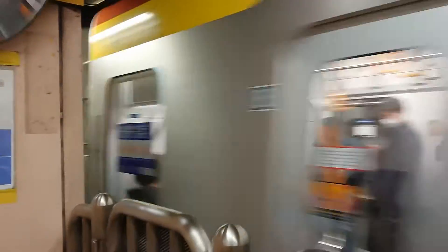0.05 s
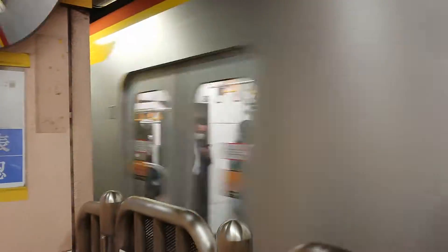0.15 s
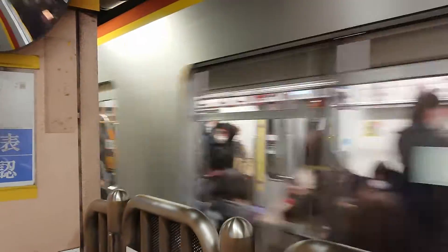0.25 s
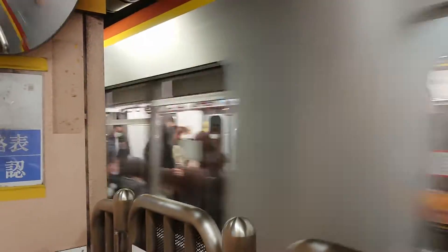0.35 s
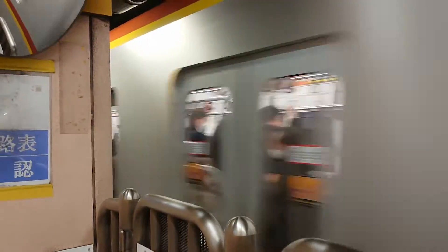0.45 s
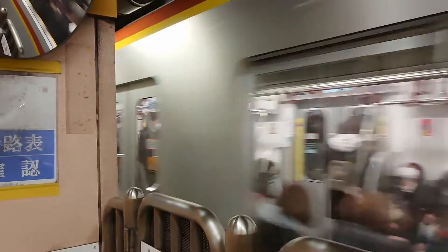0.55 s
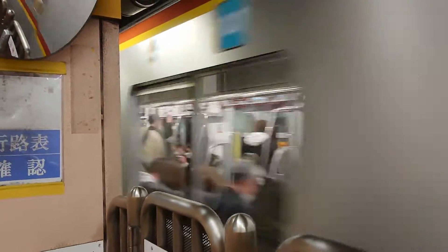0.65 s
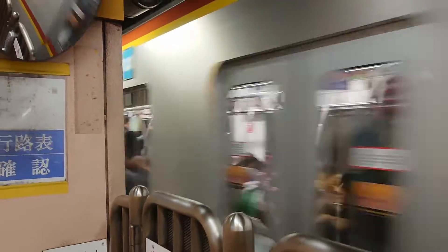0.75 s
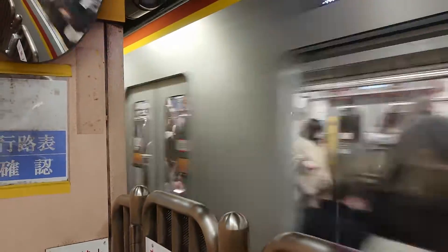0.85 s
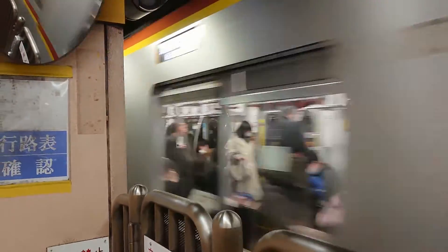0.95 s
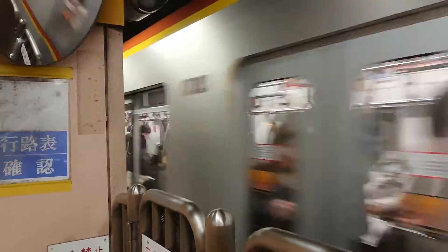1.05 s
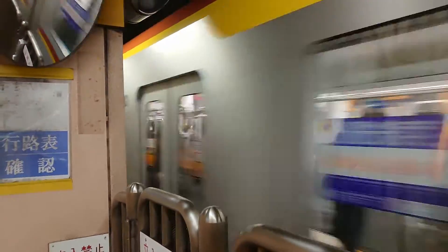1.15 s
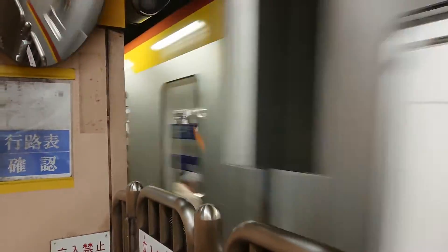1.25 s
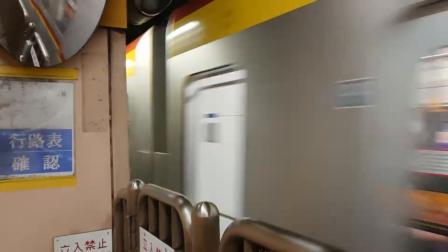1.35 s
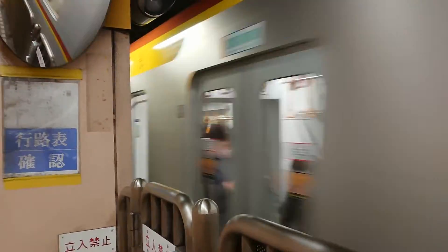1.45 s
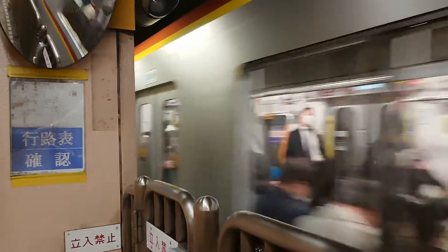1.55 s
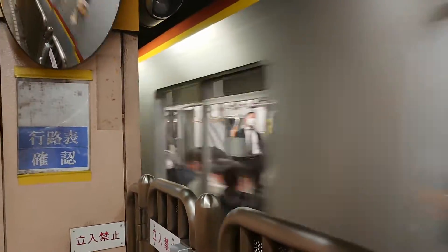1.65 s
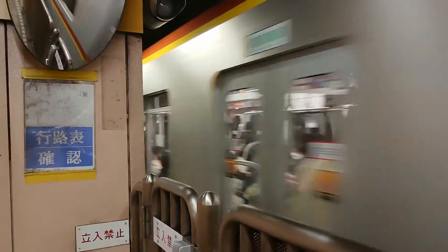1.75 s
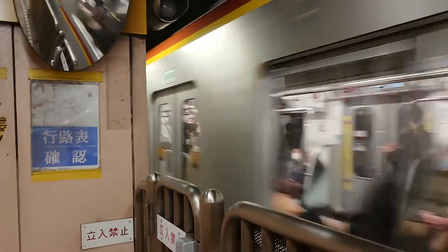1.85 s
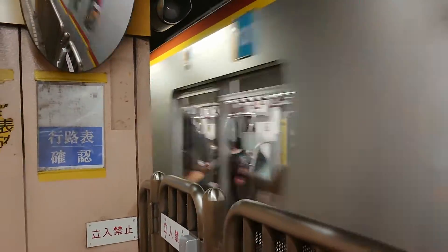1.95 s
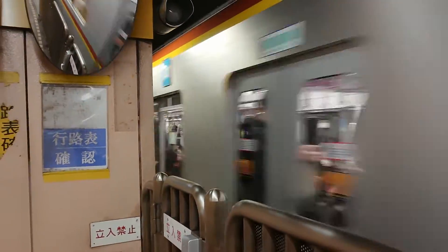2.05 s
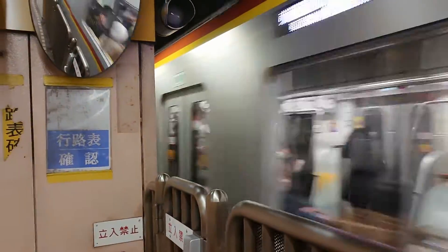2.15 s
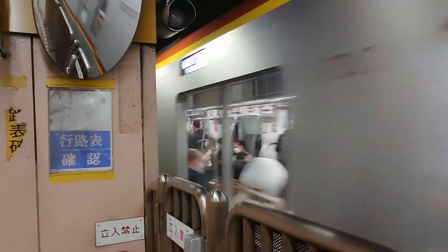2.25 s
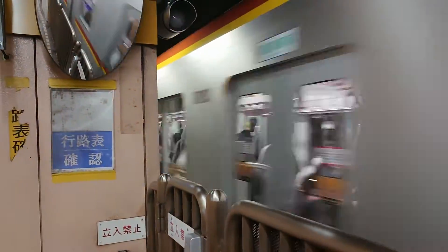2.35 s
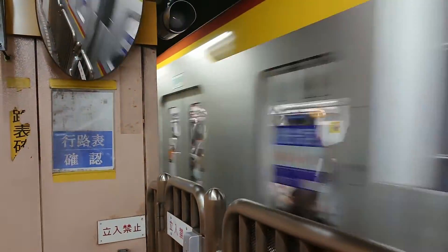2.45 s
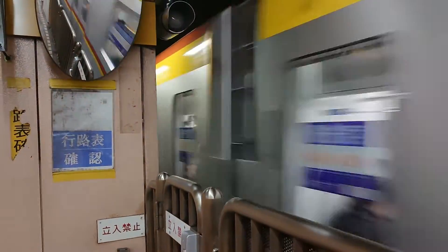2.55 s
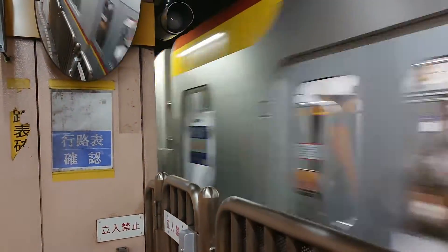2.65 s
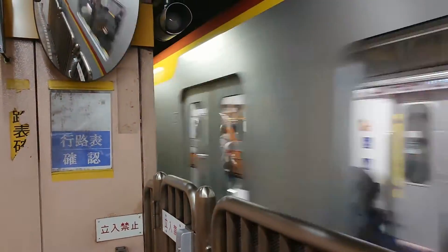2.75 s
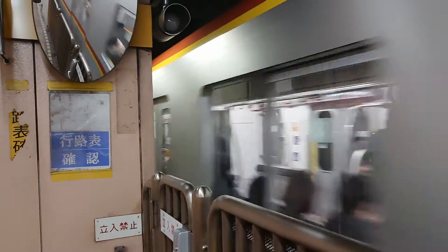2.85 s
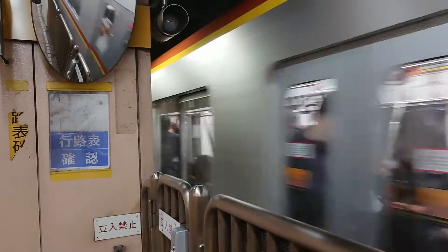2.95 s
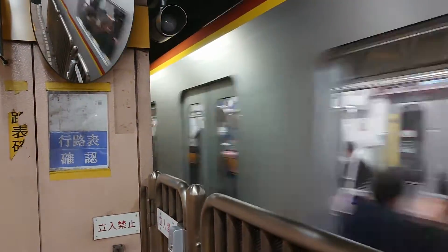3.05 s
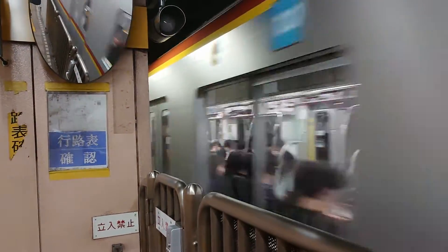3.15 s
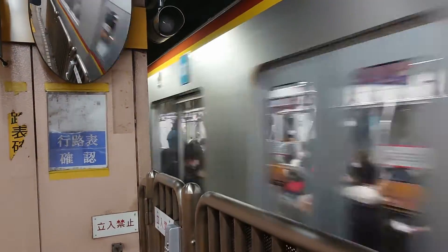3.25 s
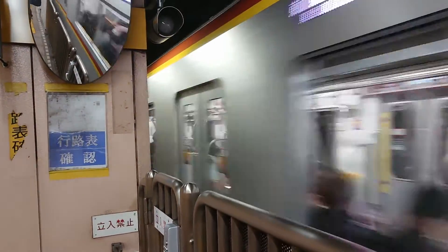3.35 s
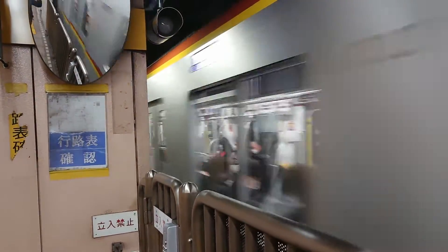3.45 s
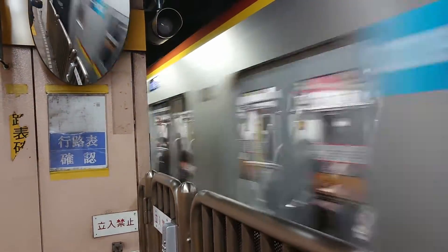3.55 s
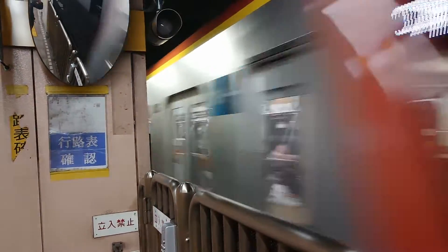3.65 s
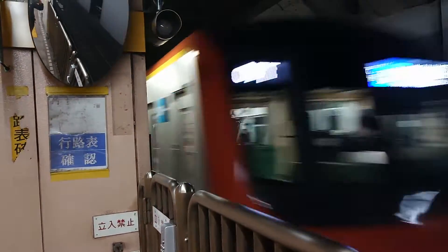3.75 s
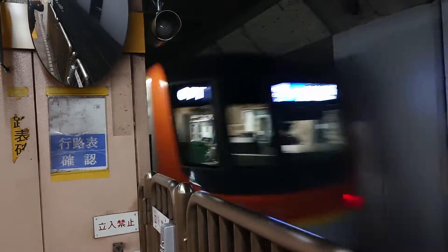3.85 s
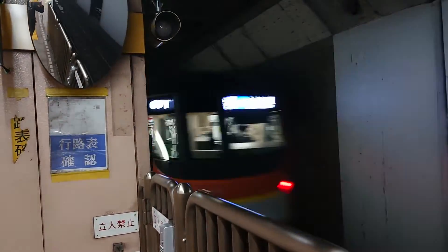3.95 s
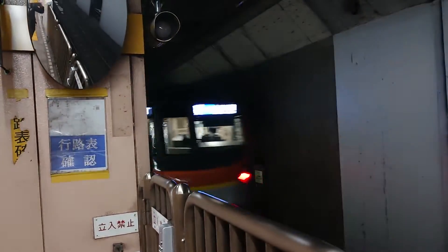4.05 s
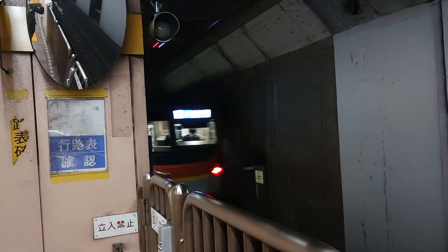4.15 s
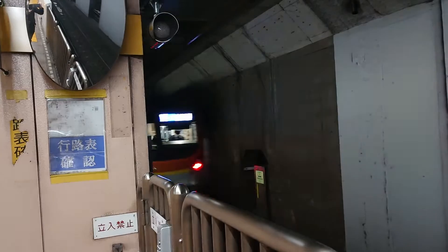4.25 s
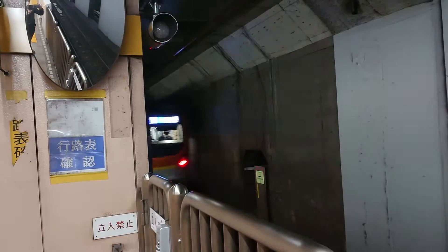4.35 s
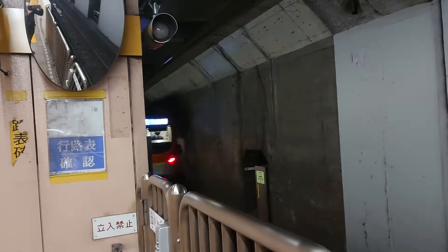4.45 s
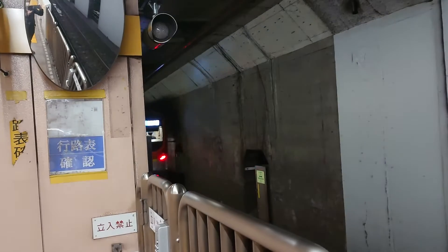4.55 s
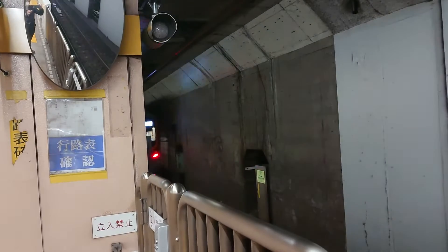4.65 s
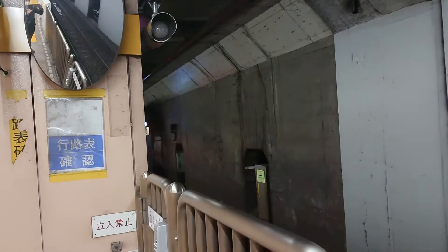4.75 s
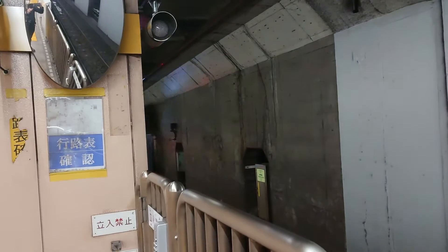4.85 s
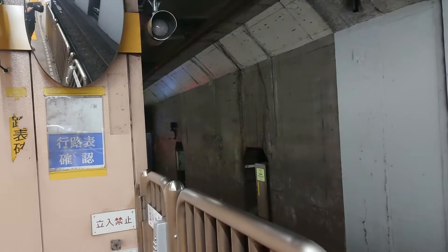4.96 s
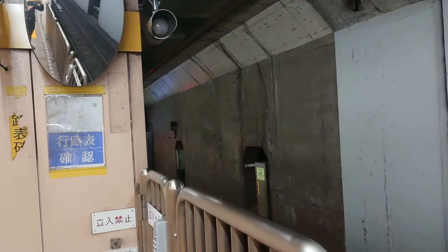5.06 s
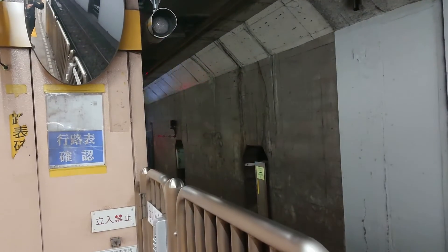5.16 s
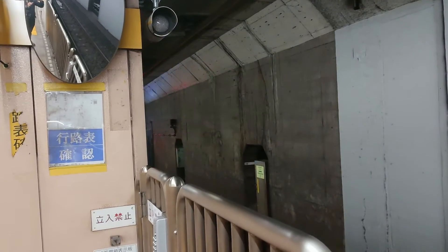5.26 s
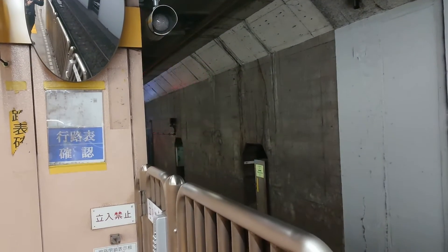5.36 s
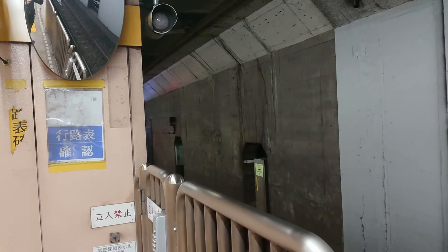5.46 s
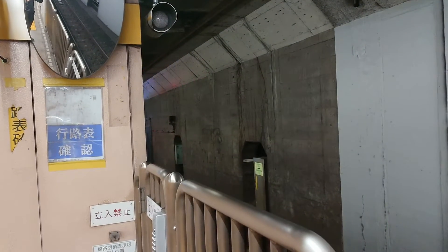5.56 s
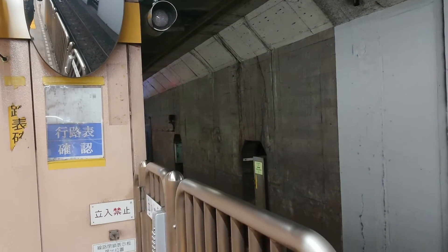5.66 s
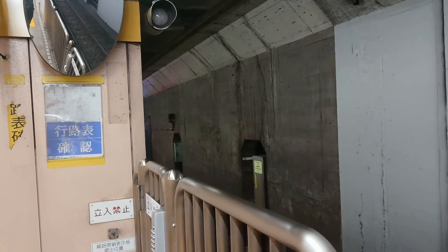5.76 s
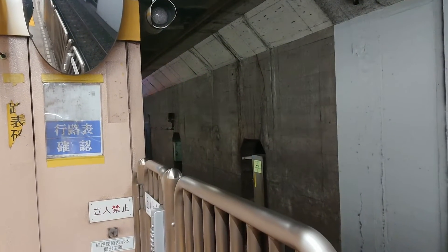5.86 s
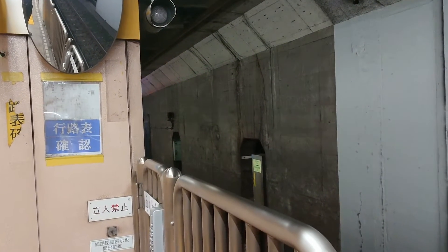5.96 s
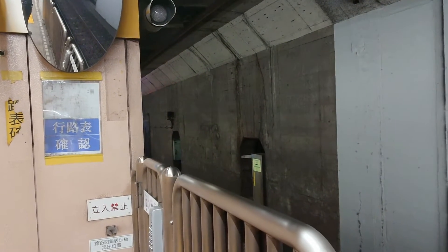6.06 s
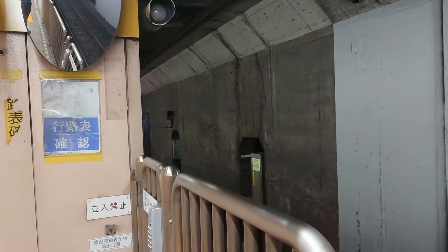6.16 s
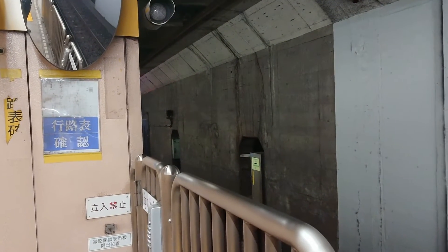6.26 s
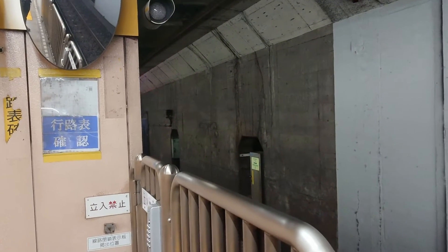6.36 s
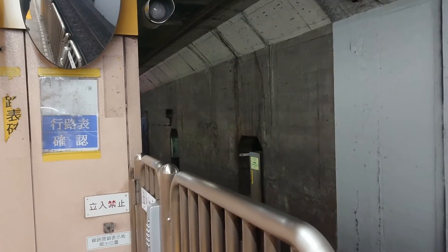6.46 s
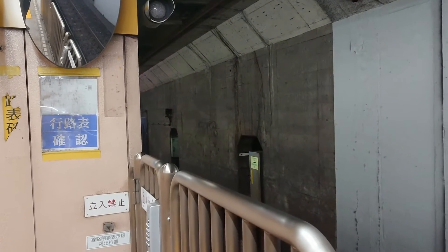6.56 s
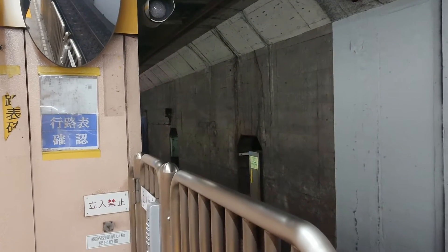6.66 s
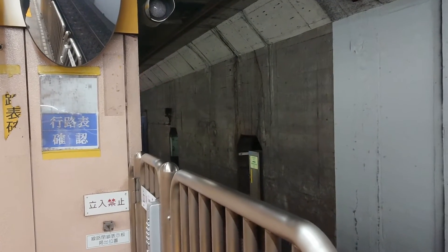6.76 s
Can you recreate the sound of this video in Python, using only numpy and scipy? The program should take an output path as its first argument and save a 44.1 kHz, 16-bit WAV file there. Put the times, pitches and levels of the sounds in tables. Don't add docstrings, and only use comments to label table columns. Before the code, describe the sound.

Close beside an underground platform, train cars roar past with a booming low rumble, metallic wheel ring, dull knocks and short air hisses. Around four seconds the last car passes and the sound sinks into the tunnel, losing brightness, while the trailing draught flutters and thumps against a hand-held phone microphone, hardest just after six seconds.

```python
import sys
import numpy as np
from scipy import signal
from scipy.fft import rfft, irfft
from scipy.io import wavfile
from scipy.ndimage import uniform_filter1d

SR = 44100
rng = np.random.default_rng(int(sys.argv[2]) if len(sys.argv) > 2 else 0)


def wav_record(signal):
    frames = np.transpose(np.atleast_2d(signal))
    bounded = np.clip(frames, -1, 1)
    quanta = np.round(bounded * 32767).astype(np.int16)
    wavfile.write(sys.argv[1], SR, quanta)


def boost_factor(decibels):
    exponent = np.asarray(decibels, float) / 20
    return 10 ** exponent


N = 300762
T = np.arange(N) / SR
HZ = np.maximum(np.arange(N // 2 + 1) * SR / N, 1)
LAST_CAR_S = 3.96


def on_hz(table, hz):
    f, v = np.transpose(table)
    return np.interp(np.log(hz), np.log(f), v)


def curves(table):
    s, *columns = np.transpose(table)
    return np.array([np.interp(T, s, c) for c in columns])


def unit(x):
    return x / np.sqrt(np.mean(x ** 2))


def coloured_noise(colour):
    return unit(irfft(rfft(rng.standard_normal(N)) * boost_factor(on_hz(colour, HZ)), N))


def walk(rate_hz):
    hold = int(SR / rate_hz)
    steps = np.repeat(rng.standard_normal(N // hold + 1), hold)
    return 1.84 * uniform_filter1d(uniform_filter1d(steps, hold), hold)[:N]


def swell(rows):
    return sum(db * np.exp(-((T - s) / width_s) ** 2) for s, db, width_s in rows)


def pair():
    # frequency in Hz, left-right likeness as a share.
    likeness = [(60, 1), (150, 0.97), (300, 0.92), (440, 0.73), (860, 0.49), (1700, 0.016), (14000, 0.16)]
    mid, side = rfft(rng.standard_normal((2, N)))
    like = np.clip(on_hz(likeness, HZ), 0, 1)
    return np.sqrt((1 + like) / 2) * mid + np.sqrt((1 - like) / 2) * side * np.array([[1], [-1]])


def resonance(source, hz, width_hz, core=(1, 1, -99)):
    def mode(hz, width_hz):
        return 1 / (1 + 1j * (HZ / hz - hz / HZ) * hz / width_hz) ** 2

    core_hz, core_width_hz, core_db = core
    response = mode(hz, width_hz) + boost_factor(core_db) * mode(core_hz, core_width_hz)
    return unit(irfft(source * response, N))


def grains(table, glide, front, scatter):
    # frequency in Hz, level in dB per Hz.
    tear_colour = [(120, -21.5), (220, 6.5), (350, -3), (600, -13.5), (900, -25), (1500, -26.5),
                   (3000, -59.5)]
    tear = coloured_noise(tear_colour)
    out = np.zeros(N)
    front = np.clip(front, .3, 1)
    top = .5 ** (1 / front)
    for (s, db, hz, ms, tear_db), turn in zip(table, rng.random((len(table), 1))):
        u = np.linspace(0, 1, int(2 * ms * SR / 1000))
        turns = np.cumsum(hz * (1 + glide * (top - u))) / SR
        phase = 2 * np.pi * (turns - turns[int(len(u) * top)] + scatter * (turn - .5))
        at = np.clip(int(s * SR - len(u) * top) + np.arange(len(u)), 0, N - 1)
        envelope = np.sin(np.pi * u ** front) ** 2
        out[at] += boost_factor(db) * envelope * (np.cos(phase) + boost_factor(tear_db + 9) * tear[at])
    return out


def layers():
    # time in s, level in dB.
    nearness = [(0, -1.5), (.45, -1), (1, -0.5), (1.5, -0.5), (2, 0.5), (2.5, 0.5), (2.9, -0.5), (3.3, -.5),
                (3.6, -2.5), (3.9, -3), (4.22, -3.5), (4.4, -5), (4.8, -7), (5.3, -8.5), (5.8, -11),
                (6.2, -12.5), (6.5, -11), (6.82, -10.5)]
    # level in dB, share of the nearness, swell in dB as a coupling passes, time of one swell in s.
    parts = [
        (-18.5, 1.21, 0, 2),
        (-20, 1.205, 1, 1.44),
        (-25.5, 1.016, 0.3, 1.7),
        (-35, 0.71, 0.8, 1.4),
    ]
    car_s = 1.15
    near_db = curves(nearness)[0]
    passing = np.clip((LAST_CAR_S - T) / 0.25, 0, 1)
    return np.array([db + share * near_db + swell_db * passing * np.cos(2 * np.pi * (T - s) / car_s)
                     for db, share, swell_db, s in parts])


def in_tunnel():
    # level at the platform in dB, change in the tunnel in dB.
    ring_balance = [
        (-7, 11.5),
        (-1.5, 5),
        (-0.16, -2.5),
    ]
    into_tunnel_s = 2.04
    share = np.clip((T - LAST_CAR_S) / into_tunnel_s + 1, 0, 1)
    return [db + change_db * share for db, change_db in ring_balance]


def rolling(steer_db):
    # frequency in Hz, level in dB per Hz.
    roughness = [(40, -26.5), (70, -11), (105, -5.5), (160, -2), (230, -5), (310, -10.5), (520, -9.5),
                 (900, -19.5), (1500, -27), (2300, -27.5), (3200, -35), (5000, -39), (9000, -43.5),
                 (14000, -54.5)]
    steer_hz = [190, 550, 1800, 4500]
    level_db = -14.5
    source = pair() * boost_factor(on_hz(roughness, HZ))
    scale = np.sqrt(np.mean(irfft(source, N) ** 2))
    swell_db = .4 * walk(2.5)
    octave = np.log2(HZ)
    out = 0
    for step in range(18):
        centre_hz = 40 * 2 ** (step / 2)
        mask = np.cos(np.pi / 2 * np.clip(2 * (octave - np.log2(centre_hz)), -1, 1)) ** 2
        share = [np.interp(np.log(centre_hz), np.log(steer_hz), row) for row in np.eye(4)]
        flicker_db = 1.2 * min(300 / centre_hz, 1) + .4
        band_db = share @ steer_db + swell_db + flicker_db * walk(9)
        out = out + boost_factor(band_db) * irfft(source * mask, N)
    return boost_factor(level_db) * out / scale


def booms(roar_db):
    # frequency in Hz, width in Hz, level in dB.
    cavities = [(61.6, 24, -11.5), (142.9, 20.7, -7), (168, 26.7, -6), (217.9, 37.5, -8.5),
                (337.3, 36, -15), (459.6, 56, -17)]
    # time in
    # s, level in dB, width in s.
    boom_swells = [
        [(.5, -7.5, .08), (2.07, 3.5, .08), (2.42, -5.5, .15)],
        [(0, 8, 0.61), (1.25, -0.5, 0.19), (1.85, 4, .12), (2.3, 2, .15), (2.8, 3, .15), (3, 2, 0.47),
         (3.8, -4, .15)],
        [(.2, -11.5, 0.44), (.8, -3, .12), (1.65, -4, .1), (4.7, -4, .15), (2.7, 3.5, 0.62), (3.7, -6, 0.36)],
        [(.3, -4, 0.15), (1.3, 6, 0.24), (1.85, 2.5, .1), (2.3, 4.5, 0.13), (3.6, -4.5, 0.19)],
        [(.08, 8, 0.092), (1, -3, 0.22), (1.63, 10, 0.14), (2, -9.5, 0.1), (2.5, 8, 0.13), (6, -8, .06)],
        [(.33, 8, .1), (.6, -2, .1), (1.35, 12.5, .12), (2.05, -4.5, 0.11), (2.55, -1, .1), (6, -8, .06)],
    ]
    source = pair()
    return sum(boost_factor(roar_db + db + swell(rows) + walk(3.99)) * resonance(source, hz, width_hz)
               for (hz, width_hz, db), rows in zip(cavities, boom_swells))


def wheels(roll_db):
    # frequency in Hz, width in Hz, level in dB.
    modes = [(1287, 440, -5), (1892, 324, -6.5), (2667, 325, -10), (3650, 400, -12.5), (4420, 370, -16.5)]
    # frequency in Hz, width in Hz, dB over the broad ring.
    cores = [(1313, 83, -5.5), (1952, 110, -14), (2705, 100, -7.5), (3726, 100, -11.5), (4340, 70, -8)]
    # time in s,
    # level in dB, width in s.
    mode_swells = [
        [(3, 2, 0.35), (3.95, 0.5, 0.22), (5.3, -1.5, 0.32), (6, -1.5, .2)],
        [(1.2, -1.5, .9), (2.75, 1, .15), (4.15, 1, .2), (5.3, 0.5, 0.34), (6.6, -1, .3)],
        [(1.5, -2, .9), (3, 2, 0.41), (3.9, 0, 0.43), (5.2, 2, 0.37), (6.6, -1.5, .3)],
        [(1, -1.5, .8), (6.6, -1, .3)],
        [(3.5, -1.5, .6), (6.6, -2, .3)],
    ]
    # time in s, pitch drop as a share.
    recede = [(0, 0), (3.7, 0), (4.5, .025), (6.82, .035)]
    air_loss_db_per_s = 2.5
    waver_share = .004

    source = pair()
    lowest_db, upper_db, _ = in_tunnel()
    loss_db = air_loss_db_per_s * np.maximum(T - recede[1][0], 0)
    ring = []
    for (hz, width_hz, db), core, rows in zip(modes, cores, mode_swells):
        mode_db = db - loss_db * (hz / 3000) ** 2 + swell(rows) + walk(6)
        ring.append(boost_factor(mode_db) * resonance(source, hz, width_hz, core))

    place = np.cumsum(1 - curves(recede)[0] + waver_share * walk(8))

    def bend(part):
        return np.array([np.interp(place, np.arange(N), port) for port in part])

    return boost_factor(roll_db + lowest_db) * bend(ring[0]) + boost_factor(roll_db + upper_db) * bend(sum(ring[1:]))


def air():
    # time in s, peak in dB above 8 kHz, attack in s, release in s.
    jets = [(.08, -56, 0.12, 0.074), (.33, -54.5, 0.089, 0.023), (.7, -70.5, .2, 0.18),
            (1.62, -65.5, 0.16, 0.14), (2.13, -53.5, 0.066, 0.072), (2.4, -51.5, 0.085, 0.089),
            (2.55, -49.5, 0.07, 0.066), (2.66, -52, .05, 0.11), (2.85, -56, 0.094, 0.13),
            (3.55, -71, 0.048, 0.08), (4.05, -63.5, 0.16, .05), (4.22, -67, 0.099, 0.33)]
    # frequency in Hz, level in dB.
    jet_colour = [(800, -7), (2000, 6), (3500, 3.5), (7000, -0.5), (10000, 0), (13000, 2.5), (15500, 7.5)]
    leak_db, leak_fade_db_per_s, level_db = -70, 4.5, 28.5
    flow = boost_factor(leak_db - leak_fade_db_per_s * np.maximum(T - LAST_CAR_S, 0))
    for s, db, attack_s, release_s in jets:
        rise = (np.minimum(T - s, 0) / attack_s) ** 2
        fall = (np.maximum(T - s, 0) / release_s) ** 2
        flow = flow + boost_factor(db) * np.exp(-rise - fall)
    hiss = unit(irfft(pair() * boost_factor(on_hz(jet_colour, HZ)), N))
    return flow * boost_factor(level_db + 1.2 * walk(35)) * hiss


def draught():
    # time in s, left level in dB, right level in dB.
    gust_levels = [(0, -37.5, -35.5), (.9, -33, -29.5), (1.05, -29.5, -19.5), (1.35, -28, -24),
                   (1.5, -31, -30), (2.5, -26.5, -21.5), (3.5, -28, -29.5), (4, -22, -18.5),
                   (4.3, -17, -21.5), (4.75, -27.5, -32.5), (5.1, -18, -26.5), (5.5, -26, -29),
                   (5.75, -22.5, -25.5), (6.03, -26.5, -25.5), (6.3, -14, -24), (6.5, -22.5, -27),
                   (6.7, -15, -23.5), (6.82, -15, -26)]
    # frequency in Hz, level in dB.
    wind_colour = [(25, -25.5), (45, -3), (62, 9), (90, -1.5), (150, -6.5), (300, -12), (600, -52)]
    # time in s, peak in dB, frequency in Hz, length in ms.
    left_eddies = [(3.294, -11, 78, 38), (4.086, -14, 170, 14), (4.113, -9, 101.4, 19),
                   (4.245, -4.5, 70.6, 38), (4.481, -9.5, 93, 18), (4.503, -11, 103.4, 14),
                   (5.04, -6, 121.5, 15), (5.062, -11.5, 78, 22), (5.124, -8, 141.6, 7.3),
                   (5.307, -5, 145.6, 8), (5.584, -6.5, 110, 10), (5.608, -9.5, 70.2, 16),
                   (5.626, -11.5, 70.5, 14), (5.655, -8.5, 100, 10), (5.671, -5.5, 75, 14),
                   (5.688, -10, 90.4, 9), (5.707, -11, 79, 15), (5.88, -8.5, 74.3, 17),
                   (5.904, -3.5, 101.8, 13), (5.928, -6.5, 138, 11), (6.119, -12.5, 113, 19),
                   (6.203, -13.5, 79.7, 10), (6.2135, -8.5, 168, 5.5), (6.194, -9, 90, 12),
                   (6.235, 7.5, 149.6, 6.5), (6.246, 4, 74.5, 11), (6.262, -11.5, 70, 14),
                   (6.297, -7, 120, 8), (6.32, -11.5, 75, 20), (6.357, -5, 120, 8.2),
                   (6.378, -3.5, 84.7, 36), (6.591, -9, 119.7, 12), (6.602, -10, 130, 8),
                   (6.615, -7.5, 131.4, 8), (6.6295, -0.5, 112, 11), (6.697, 1, 110.5, 7.6),
                   (6.705, -5.5, 69, 8), (6.722, -3.5, 152.5, 14), (6.732, -5, 139, 6),
                   (6.746, -5.5, 139, 9), (6.751, -7.5, 110, 8), (6.78, -3.5, 150, 6.8),
                   (6.788, -3, 69.2, 14), (6.805, -8, 64.8, 12)]
    right_eddies = [(1.047, -17.5, 105.7, 26), (1.083, -9.5, 71, 25), (1.192, -12.5, 69, 13),
                    (1.244, -9, 72.3, 20), (1.3, -12.5, 65.6, 31), (2.6, -9.5, 80.6, 33),
                    (2.648, -8, 76, 21), (2.679, -13.5, 87.3, 12), (4.057, -4, 89.6, 18),
                    (4.086, -7, 142, 18), (4.119, -6.5, 124.3, 12), (4.14, -8.5, 85.4, 19),
                    (4.212, -12, 124, 8.7), (5.117, -13, 100, 8), (6.242, -16.5, 102.3, 22),
                    (6.285, -11, 124, 9.8)]
    slaps = [(5.039, -8.5, 416, 3.3), (5.894, -12.5, 470, 2.7), (5.95, -14, 280, 5), (6.235, 0, 330, 4),
             (6.2345, -3, 650, 3.2), (6.238, -8, 590, 1.8), (6.235, -3, 1100, 1.4), (6.237, -10, 1100, 2),
             (7.1, -17, 2400, 1), (6.2345, -22, 4800, .6), (7.4, -10.5, 500, 3), (6.724, -10, 400, 4),
             (5.586, -15, 340, 3), (5.666, -15, 450, 2.6), (5.698, -13, 360, 3), (6.78, -13, 330, 4),
             (6.604, -11, 460, 2.8), (6, -9, 390, 5), (6.6345, -4, 430, 3), (6.59, -14, 450, 4),
             (6.626, -12, 550, 4), (7.6, -13.5, 400, 3.3), (6.697, -9, 330, 3), (6.736, -5, 480, 3),
             (6.712, -12, 300, 6), (6.743, -11, 350, 5)]
    tear_db, tear_db_per_octave = -25, 8.5

    def torn(rows):
        return [(*row, tear_db + tear_db_per_octave * np.log2(row[2] / 100)) for row in rows]

    gusts_db = curves(gust_levels)
    flutter = np.array([coloured_noise(wind_colour) * boost_factor(db - 3 + 1.5 * walk(14)) for db in gusts_db])
    flutter[0] += grains([(*row, -30) for row in slaps], glide=.7, front=.7, scatter=.3)
    left = torn([*left_eddies, *small_eddies(gusts_db[0], count=16)])
    right = torn([*right_eddies, *small_eddies(gusts_db[1], count=5)])
    return flutter + np.array([grains(rows, glide=1.1, front=.42, scatter=.2) for rows in (left, right)])


def impacts():
    # time in s, peak in dB, frequency in Hz.
    floor_knocks = [(0.015, -10, 190), (0.628, -8, 188), (0.689, -10, 152), (0.874, -5.5, 158.4),
                    (1.138, -9, 180), (1.407, -6.5, 204), (1.486, -6.5, 184), (1.842, -7.5, 154),
                    (1.955, -6.5, 217), (2.063, -5.5, 162), (2.249, -4.5, 171), (2.606, -2, 159.4),
                    (2.766, -1.5, 162), (2.943, -8, 140), (3.268, -9.5, 135), (3.708, -11, 132)]
    # time in s, peak in dB, frequency in Hz, length in ms.
    joint_thuds = [(0.357, -16, 66.5, 39), (0.616, -15, 78, 15), (1.552, -22, 92, 50),
                   (1.675, -16.5, 64.5, 56), (1.93, -23.5, 64.4, 67), (0.191, -23, 66.4, 34),
                   (1.82, -23.5, 75.5, 22), (2.08, -14, 65, 39), (3.16, -19, 80.4, 29),
                   (2.923, -15.5, 70, 23), (3.379, -18, 80, 34), (3.421, -15.5, 75.8, 26)]
    loose_clacks = [(4.414, -19, 522, 10), (4.934, -17, 700, 3), (4.945, -16.5, 500, 16),
                    (5.21, -21, 253, 8), (5.754, -25, 256, 8)]
    knock_db, knock_ms, knock_rise_s = -7.5, 22, .012
    hits = [(s + knock_rise_s, db + knock_db, hz, knock_ms, -24) for s, db, hz in floor_knocks]
    hits += [(*row, -24) for row in joint_thuds]
    hits += [(*row, -30) for row in loose_clacks]
    return grains(hits, glide=0.53, front=0.9, scatter=1)


def grind_flare():
    # time in s, level in dB, width in s.
    hiss_swells = [(2.3, -1.5, .05), (2.44, 3.5, .06), (2.55, 3, .05), (4.1, .5, .2), (6.65, -3, 0.38)]
    grind_s, grind_db, grind_width_s = 2.5, 2, .2
    return swell(hiss_swells) + swell([(grind_s, grind_db, grind_width_s)]) * walk(60)


def small_eddies(gust_db, count):
    wake_s, wake_end_s = 4, 5.85
    over_draught_db, eddy_hz, eddy_ms = 9, 100, 14
    place, size, pitch, length = rng.random((count, 4)).T
    s = wake_s + (wake_end_s - wake_s) * (np.arange(count) + place) / count
    db = np.interp(s, T, gust_db) + over_draught_db - 8 * size
    return np.transpose([s, db, eddy_hz * (.75 + pitch / 2), eddy_ms * (.6 + length)])


def at_ports(train):
    # frequency in Hz, left minus right in dB.
    port_lean = [(60, 0), (280, -1.5), (800, -3.5), (1340, -4), (2260, -4.5), (3790, 0.5), (6360, -7.5),
                 (9000, 8.5)]
    left_lag_s = 8 / SR
    lean_db = on_hz(port_lean, HZ) / 2
    lag = np.array([np.exp(-2j * np.pi * HZ * left_lag_s), np.ones_like(HZ)])
    return irfft(rfft(train) * boost_factor(np.array([lean_db, -lean_db])) * lag, N)


def scene():
    roll_ref_db = [-16, -19, -27, -37]
    hiss_fade_db_per_s, grind_share = 3.5, .7
    levels_db = layers()
    flare_db = grind_flare()
    steer_db = levels_db - np.array(roll_ref_db)[:, None]
    steer_db[3] += flare_db - hiss_fade_db_per_s * np.maximum(T - LAST_CAR_S, 0)
    steer_db[2] += in_tunnel()[2] + grind_share * flare_db
    train = rolling(steer_db) + booms(levels_db[0]) + wheels(levels_db[2]) + air() + impacts()
    return at_ports(train) + draught()


def band_limit(x):
    return signal.sosfilt(signal.butter(12, 15800, fs=SR, output="sos"), x)


def record(dry):
    # frequency in Hz, level in dB.
    mic_colour = [(22, -28), (32, -3), (45, 2), (5000, -3.5), (6250, -9), (6900, -18.5), (7350, -24),
                  (7550, -39), (7800, -21.5), (8600, -25.5), (11000, -25.5), (12200, -34.5), (13400, -35),
                  (14000, -47.5), (15500, -42)]
    # time in s, gain in dB, recovery in s.
    gain_ducks = [
        (4.265, -2.5, 0.5),
        (6.227, -8.5, 0.76),
    ]
    attack_s, ceiling = 0.0032, .887
    heard = irfft(rfft(dry) * boost_factor(on_hz(mic_colour, HZ)), N)
    for s, db, recovery_s in gain_ducks:
        onset = np.clip((T - s) / attack_s, 0, 1)
        heard = heard * boost_factor(db * onset * np.exp(-np.maximum(T - s, 0) / recovery_s))
    heard = heard / (1 + np.abs(heard / ceiling) ** 12) ** (1 / 12)
    return band_limit(heard)


dry = scene()
out = record(dry)
wav_record(out)
```